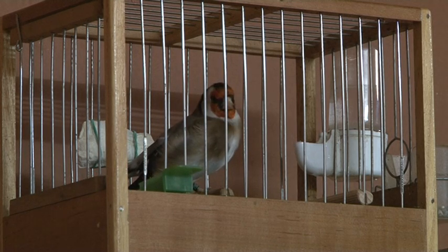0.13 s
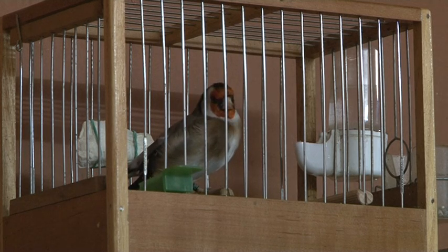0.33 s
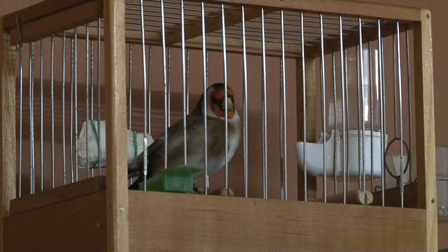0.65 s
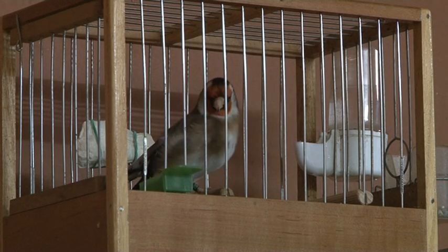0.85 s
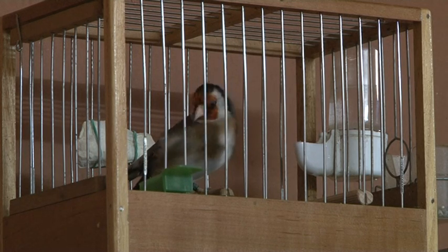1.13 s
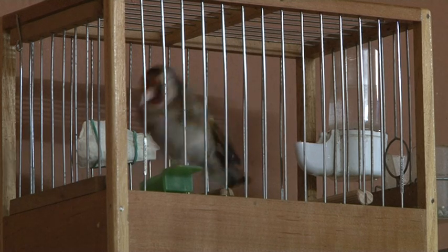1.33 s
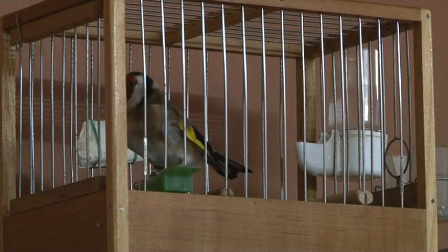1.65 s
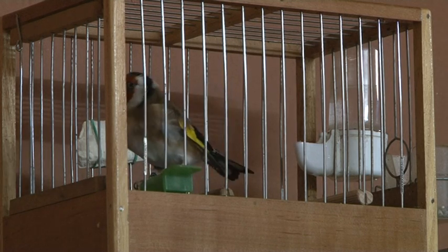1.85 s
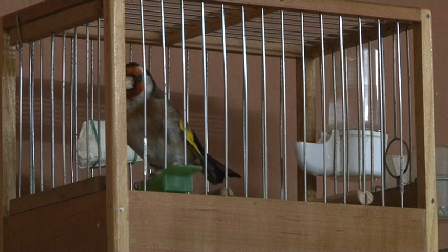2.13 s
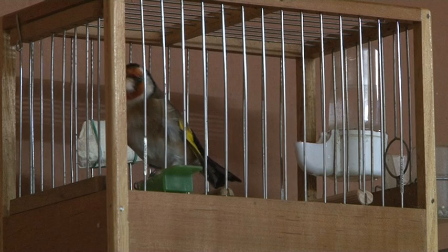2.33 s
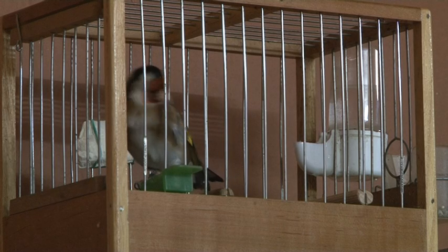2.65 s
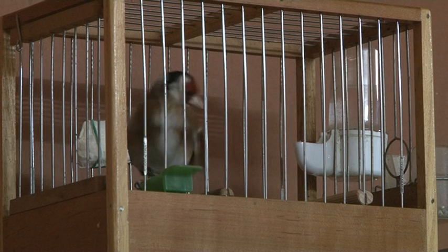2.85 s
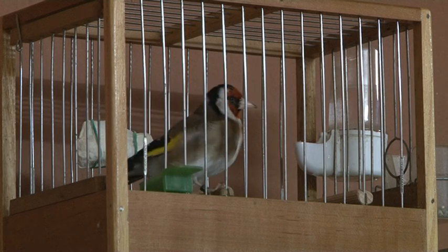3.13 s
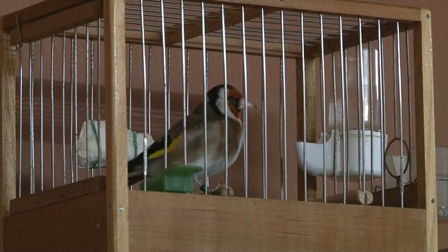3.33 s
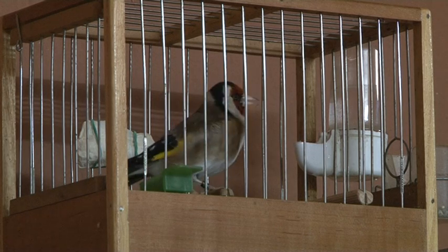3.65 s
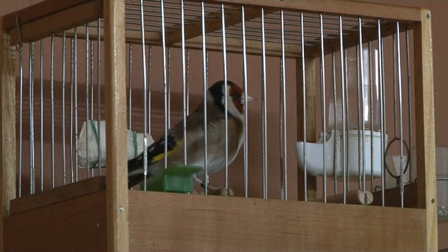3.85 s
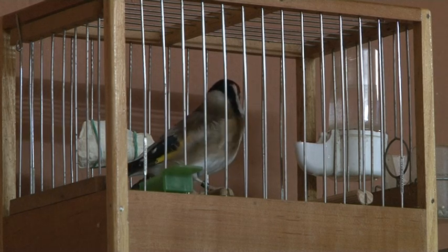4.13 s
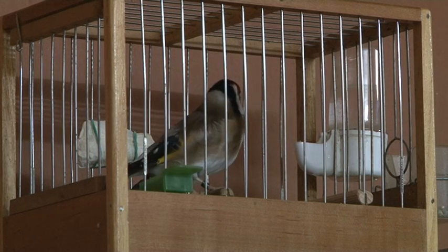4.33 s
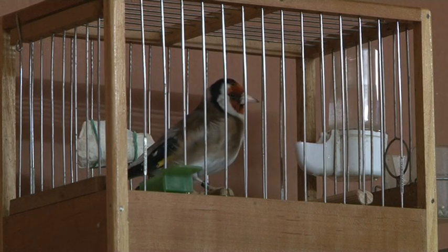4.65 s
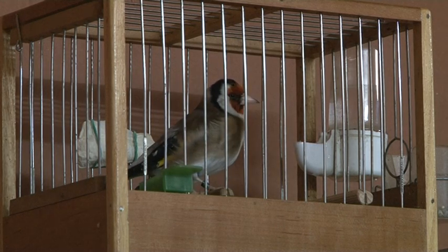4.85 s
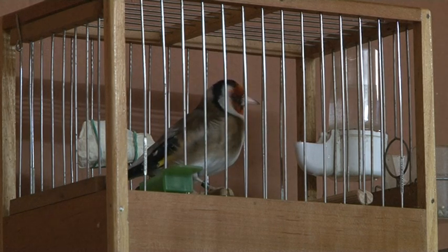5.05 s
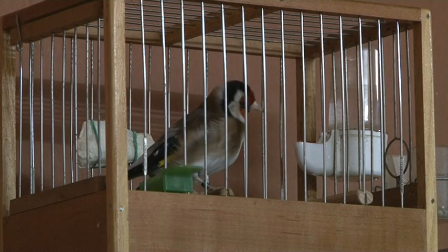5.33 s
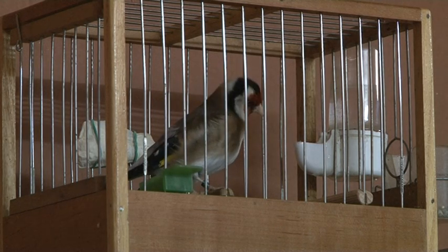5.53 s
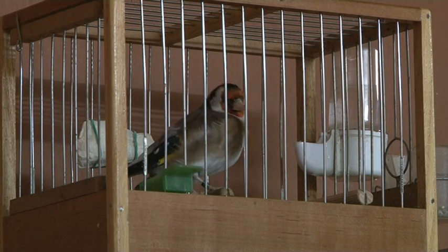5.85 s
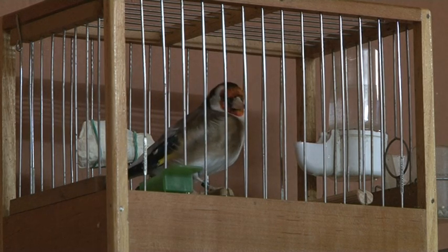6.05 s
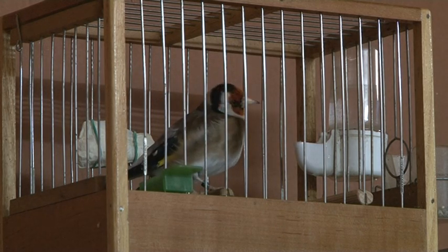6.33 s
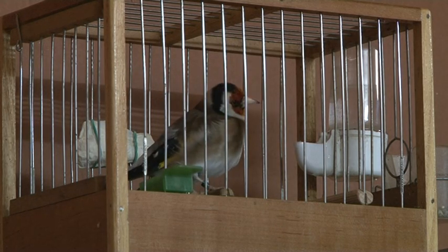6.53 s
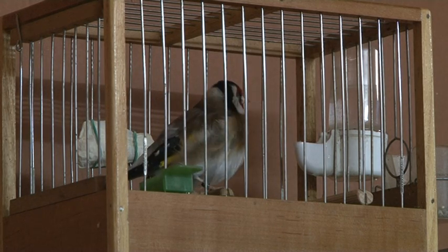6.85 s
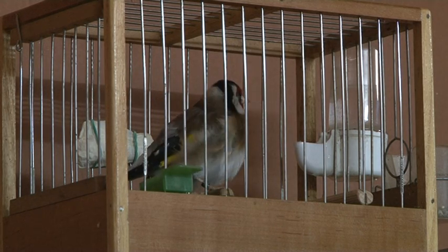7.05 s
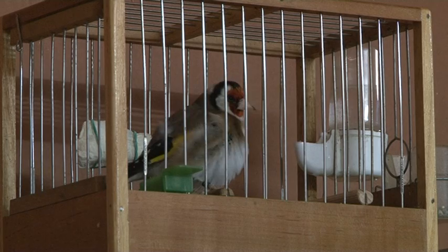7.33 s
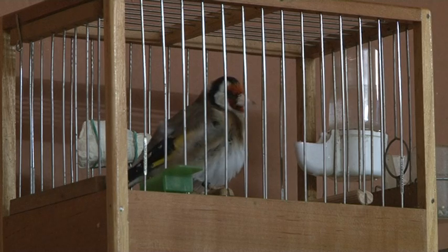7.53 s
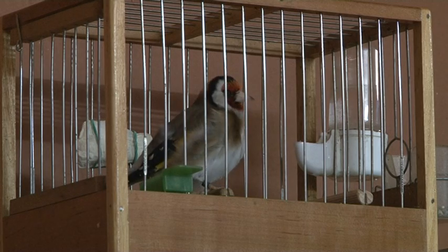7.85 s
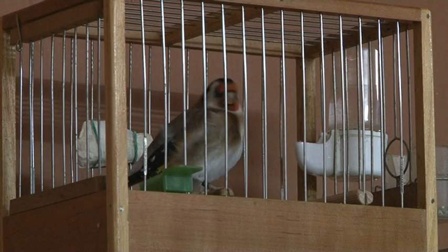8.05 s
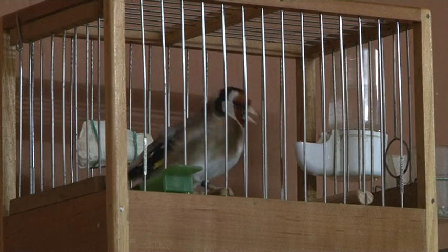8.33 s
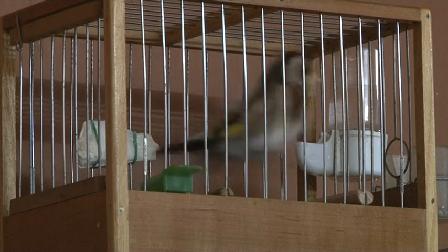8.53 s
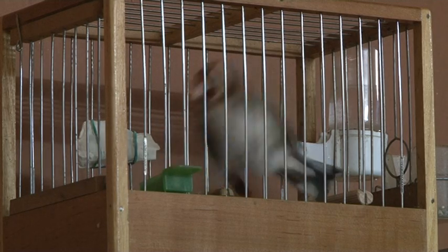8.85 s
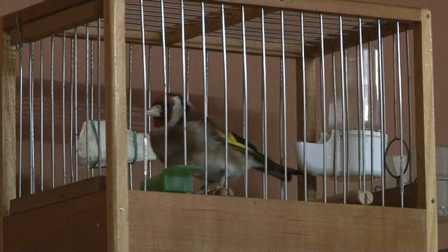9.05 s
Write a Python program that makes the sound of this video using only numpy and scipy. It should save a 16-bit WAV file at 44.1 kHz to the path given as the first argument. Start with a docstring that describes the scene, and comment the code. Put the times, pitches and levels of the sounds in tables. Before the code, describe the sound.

Five quick bursts of thin whistles, nasal buzzes and chirps from a small finch indoors, with claw scuffs and dull wooden knocks between.

```python
"""Five short twittering phrases of a small caged finch, close to a camera in a bare, echoing room.
Gliding whistles are near sines, duets two voices at once, buzzes and a rattle pulsed or many-partial tones;
between them claws and feathers scuff as filtered noise. Dull wooden knocks and a ticking clock are struck
modes. Behind lie shaped noise for the room's air and hiss, wavering hum and the whine of a tube screen."""
import sys
import numpy as np
from scipy import signal
from scipy.fft import rfft, irfft, next_fast_len
from scipy.io import wavfile
from scipy.ndimage import uniform_filter1d

SR = 44100
rng = np.random.default_rng(int(sys.argv[2]) if len(sys.argv) > 2 else 0)


def wrap_up_sound(samples):
    """Save the sound to the file named by the first command line argument, as 16-bit audio."""
    columns = np.atleast_2d(samples).T
    # keep every value between -1 and 1, then stretch to whole-number steps
    tamed = np.clip(columns, -1, 1)
    steps = np.round(tamed * 32767).astype(np.int16)
    wavfile.write(sys.argv[1], SR, steps)


def makeup_ratio(level_db):
    """Linear amplitude ratio for a level in decibels (20 dB per factor of ten)."""
    decades = np.asarray(level_db, float) / 20
    return 10 ** decades


N = 405719
LEAD = SR // 2  # samples kept ahead of time zero, so earlier notes can leave their echoes
SIDES = np.array([[.5], [-.5]])  # left and right share of a level or phase difference


def read(points, hz):
    """Table value on a log-frequency axis."""
    f, value = np.transpose(points)
    return np.interp(np.log(hz + 1), np.log(f + 1), value)


def evened(x):
    """Scales to rms 1."""
    return x / np.sqrt(np.mean(x ** 2) + 1e-20)


def add(mix, start_s, sound):
    """Mixes a sound in at its start time."""
    part = mix[..., LEAD + round(start_s * SR):][..., :sound.shape[-1]]
    part += sound[..., :part.shape[-1]]


def wobble(size, span):
    """Slow random drift of rms 1, smoothed twice over span samples."""
    smooth = uniform_filter1d(rng.standard_normal(size), int(span))
    return evened(uniform_filter1d(smooth, int(span)))


# The finch's pitch shapes by name: start and end [share of middle pitch],
# haste [under 1 glides early], loudest_at [share of length]
PITCH_SHAPES = {"sweep": (0.62, 1.19, 1.03, 0.54), "rise": (.86, 1.15, 1.1, 0.4515),
                "lift": (.93, 1.168, 0.866, 0.41), "hook": (.72, 1.1, 0.8, 0.54),
                "climb": (.88, 1.139, 0.98, 0.46), "part": (1.05, .94, 1.1, 0.44),
                "level": (0.9, 0.8, 1, .5), "scoop": (1.19, 0.942, 0.74, 0.45),
                "snap": (0.54, 1.04, .65, 0.38), "sink": (1.035, .915, 1.05, .5),
                "reach": (.83, 1.132, .95, 0.43), "flat": (1.008, .985, .95, 0.54),
                "settle": (0.8, 1.01, 0.6, 0.46), "tilt": (.94, 1.04, .95, 0.62),
                "sag": (1.02, 0.953, 0.977, 0.54), "dip": (1.12, 1.005, 1.2, 0.58),
                "fall": (1.1, .91, .95, 0.44), "drop": (1.16, 0.78, 1.4, 0.42)}
PITCH_SHAPES["arch"] = PITCH_SHAPES.pop("level")  # climbs to the middle pitch, then drops below its start
ACCENT_DB, ACCENT_WIDTH = 8, .12  # a short push of air inside a note; width as share of its length


def glide(shape, length_s, middle_hz, level_db, peak_at=None, push_at=None):
    """Pitch on a parabola through start, middle and end, its phase, and a swell of breath."""
    u = np.linspace(0, 1, round(length_s * SR))
    start, end, haste, usual_peak = PITCH_SHAPES[shape]
    parabola = np.polyfit([0, .5, 1], [start, 1, end], deg=2)
    hz = middle_hz * np.polyval(parabola, u ** haste)
    hz = hz * (1 + .005 * wobble(len(u), 30))
    warp = np.log(.5) / np.log(peak_at or usual_peak)  # puts the loudest moment at its share of the length
    swell = np.sin(np.pi * u ** warp) ** 1.24
    if push_at:
        swell = swell * makeup_ratio(ACCENT_DB * np.exp(-((u - push_at) / ACCENT_WIDTH) ** 2))
    phase = 2 * np.pi * (np.cumsum(hz) / SR + rng.random())
    return hz, phase, makeup_ratio(level_db) * swell


# 2nd to 4th partial of a whistle at the source: level_db [dB against the first]
OVERTONES_DB = [-14, -16.5, -13]
# What the beak does to overtones on the way out: pitch_hz [Hz], gain_db [dB]
BEAK = [(1000, -46.5), (2000, -32.5), (3000, 4.5), (6000, -4), (8000, -17.5), (11000, -21), (15000, -28)]
BREATH_DB = -27  # turbulence riding on a whistle, before any hoarseness


def whistle(hz, phase, swell, rich_db=0, hoarse_db=0):
    """Near sine; the beak dulls the overtones that fall high, and turbulence blurs them most."""
    breath = makeup_ratio(BREATH_DB + hoarse_db) * wobble(len(hz), 22)
    tone = (1 + breath) * np.sin(phase)
    for k, db in enumerate(OVERTONES_DB, start=2):
        level = makeup_ratio(db + rich_db + read(BEAK, k * hz)) * (k * hz < SR / 2)
        tone = tone + level * np.sin(k * (phase + 3 * breath))
    return swell * tone


# Low pair answering each duet of the second phrase:
# delay_s [s], shape [name], length_s [s], middle_hz [Hz], level_db [dB]
ANSWER_PAIR = [(.001, "hook", 0.0315, 3071, -25.5), (0.041, "reach", 0.042, 3935, -23.5)]
# Each time the pair is sung: start_s [s], delay_stretch [factor], effort_db [dB], push_at [share of length]
ANSWER_TIMES = [(3.817, 0.94, 0, 0.57), (4.043, 1.07, -1, 0.37), (4.278, .97, -0.5, 0.35),
                (4.534, 1.12, 0.3, 0.39)]


def answers():
    """Whistle rows of the answering pairs; the air is pushed inside the second note of each."""
    rows = []
    for start_s, stretch, effort_db, push_at in ANSWER_TIMES:
        for delay_s, shape, length_s, hz, db in ANSWER_PAIR:
            push = push_at if shape == "reach" else None
            rows.append((start_s + stretch * delay_s, shape, length_s, hz, db + effort_db, None, push))
    return rows


# One trill note: length_s [s], middle_hz [Hz], level_db [dB]
TRILL_NOTE = (0.0253, 4750, -18)
# Faint downward flick that ends the longer notes: delay_s [s], length_s [s], middle_hz [Hz], level_db [dB]
TRILL_FLICK = (.016, .011, 3950, -33)
TRILL_START_S, TRILL_GAP_S, TRILL_COUNT = 8.455, .0743, 4
TRILL_SPREAD = .015  # random pitch spread of the later notes, as a share


def trill():
    """Whistle rows of a trill of falling notes, the first louder, shorter and a little higher."""
    length_s, hz, db = TRILL_NOTE
    rows = [(TRILL_START_S, "scoop", 0.0168, hz * 1.04, db + 4.5)]
    for k in range(1, TRILL_COUNT):
        start_s = TRILL_START_S + k * TRILL_GAP_S
        note_hz = hz * (1 + TRILL_SPREAD * rng.standard_normal())
        rows.append((start_s, "scoop", length_s, note_hz, db))
        rows.append((start_s + TRILL_FLICK[0], "drop", *TRILL_FLICK[1:]))
    return rows


# Single whistles: start_s [s], shape [name], length_s [s], middle_hz [Hz], level_db [dB];
# the first ones end just before time zero
WHISTLES = [(-.2, "sweep", 0.042, 3040, -21.5), (-.13, "sag", 0.025, 6510, -40.5),
            (-.16, "rise", 0.0585, 3964, -32.5), (-.07, "climb", 0.029, 4640, -36.5),
            (-.11, "drop", 0.011, 5240, -29), (1.791, "rise", 0.024, 2810, -39.5),
            (1.797, "sweep", 0.023, 4290, -27.5), (1.905, "rise", 0.026, 2776, -34.5),
            (1.999, "hook", 0.016, 4080, -23), (2.087, "tilt", 0.017, 3114, -26),
            (2.204, "tilt", 0.021, 2624, -25.5), (2.242, "flat", 0.02, 5914, -13.5),
            (2.277, "part", 0.022, 5100, -19), (2.283, "dip", 0.014, 4330, -17.5),
            (3.615, "settle", 0.038, 2824, -25), (3.715, "snap", 0.027, 4730, -20.5),
            (5.983, "lift", 0.018, 2707, -31), (6.072, "sweep", 0.023, 4134, -23.5),
            (6.153, "lift", 0.014, 2510, -43), (6.173, "rise", 0.0084, 2375, -33.5),
            (6.182, "sag", 0.027, 2690, -40.5), (6.345, "flat", 0.021, 5727, -25),
            (6.37, "tilt", 0.023, 5063, -19.5), (6.418, "hook", 0.016, 2670, -30.5),
            (6.431, "tilt", 0.025, 3924, -24), (6.452, "lift", 0.015, 4065, -33),
            (6.462, "lift", 0.039, 3150, -26.5), (6.476, "tilt", 0.09, 6610, -43),
            (6.52, "flat", 0.028, 6540, -21.5), (7.51, "rise", 0.023, 2436, -35.5),
            (7.572, "tilt", 0.014, 5060, -26), (7.596, "climb", 0.025, 3266, -24.5),
            (7.609, "fall", 0.039, 2550, -35.5), (7.659, "lift", 0.011, 6210, -26.5),
            (7.681, "lift", 0.02, 7420, -27.5), (7.684, "tilt", 0.015, 4120, -30),
            (7.699, "flat", 0.024, 4440, -34), (7.708, "lift", 0.025, 3730, -21),
            (7.894, "tilt", 0.027, 4830, -22.5), (7.91, "fall", 0.032, 2530, -32.5),
            (8.089, "settle", 0.045, 4200, -56.5), (8.093, "flat", 0.035, 3825, -57.5),
            (8.245, "flat", 0.02, 3550, -58), (8.675, "sag", 0.022, 5940, -37.5)]
# Shapes with stronger or weaker overtones: shape [name], level_db [dB]
RICH_DB = {"settle": 5.5, "hook": -1, "sweep": 1.5, "snap": 7.5}
# Shapes sung with more turbulence: shape [name], level_db [dB]
HOARSE_DB = {"hook": 10, "reach": 3, "sag": 6}


def sing_whistles(mix):
    """One voice of the bird, each note a glide in pitch with its own overtones and breath."""
    for start_s, *note in WHISTLES + answers() + trill():
        shape = note[0]
        add(mix, start_s, whistle(*glide(*note), RICH_DB.get(shape, 0), HOARSE_DB.get(shape, 0)))


UPPER_DB, DUET_PEAK_AT = -3.5, 0.45  # upper voice against the lower; loudest at this share of the length
DIFFERENCE_DB, SUM_DB = 10, -9  # strength of the difference tones, and of the sum tone before the beak


def duet(length_s, low_shape, low_hz, high_shape, high_hz, level_db):
    """Two membranes on one air stream also sound their sum and difference tones."""
    hz_a, a, swell_a = glide(low_shape, length_s, low_hz, level_db, DUET_PEAK_AT)
    hz_b, b, swell_b = glide(high_shape, length_s, high_hz, level_db + UPPER_DB, DUET_PEAK_AT)
    both = np.sqrt(swell_a * swell_b)
    difference = np.sin(2 * a - b) + .5 * np.sin(2 * b - a)
    difference = makeup_ratio(DIFFERENCE_DB) * both ** 3 * difference  # grows with the cube of the strength
    total = makeup_ratio(SUM_DB + read(BEAK, hz_a + hz_b)) * both * np.sin(a + b)
    return whistle(hz_a, a, swell_a) + whistle(hz_b, b, swell_b) + difference + total


# Both halves of the voice box at once: start_s [s], length_s [s], lower_shape [name], lower_hz [Hz],
# upper_shape [name], upper_hz [Hz], level_db [dB]
DUETS = [(3.747, 0.04, "flat", 5894, "tilt", 6240, -17.5), (3.974, 0.035, "sag", 5605, "sag", 6150, -18.5),
         (4.208, 0.026, "sink", 5650, "flat", 5974, -18.5), (4.463, 0.032, "sag", 5634, "sag", 6100, -18),
         (8.373, 0.032, "sink", 5490, "level", 6836, -13.5),
         (8.74, 0.083, "fall", 5034, "sag", 5207, -15.5)]
DUETS = [tuple("arch" if value == "level" else value for value in row) for row in DUETS]


def sing_duets(mix):
    """Two-voiced notes, both halves of the voice box sounding together."""
    for start_s, *voices in DUETS:
        add(mix, start_s, duet(*voices))


THROAT_WIDTH_HZ, THROAT_SKIRT_DB = 690, -12
WINDPIPE_HZ, WINDPIPE_WIDTH_HZ = 1830, 810  # low resonance heard in buzzes
RASP_DB = -9  # turbulence riding on a buzz


def buzz(rows, windpipe_db, half_db):
    """A low, unsteady pitch with many partials, the ones near the throat resonance strongest."""
    time_s, *columns = np.transpose(rows)
    t = np.arange(time_s[0], time_s[-1], 1 / SR)
    db, hz, throat_hz = (np.interp(t, time_s, c) for c in columns)
    unsteady = 1 + .015 * wobble(len(t), 25)
    phase = 2 * np.pi * np.cumsum(hz * unsteady) / SR
    k = np.arange(2, 40)[:, None] / 2  # whole partials and the lines halfway between
    gain = np.exp(-.5 * ((k * hz - throat_hz) / THROAT_WIDTH_HZ) ** 2) + makeup_ratio(THROAT_SKIRT_DB)
    gain = gain * makeup_ratio(0.87 * read(BEAK, k * hz)) * (k * hz < 16000)
    windpipe = np.exp(-.5 * ((k * hz - WINDPIPE_HZ) / WINDPIPE_WIDTH_HZ) ** 2)
    gain = gain + makeup_ratio(windpipe_db) * windpipe * (k > 1)
    gain = gain * np.where(k % 1, makeup_ratio(half_db), 1)
    spread = 0.52 * k ** 2  # spread phases: a reedy wave, not a click train
    tone = (gain * np.sin(k * phase + spread)).sum(0)
    rasp = 1 + makeup_ratio(RASP_DB) * wobble(len(t), 14)
    return makeup_ratio(db) * tone * rasp * signal.windows.tukey(len(t), .25)


# One list a buzz, its rows: time_s [s], level_db [dB], pitch_hz [Hz], throat_hz [Hz]
BUZZES = [
    [(2.02, -43.5, 760, 6200), (2.045, -33, 1130, 4850), (2.066, -24, 1275, 4950),
     (2.088, -33.5, 1359, 5160)],
    [(2.165, -30, 1217, 5870), (2.18, -33.5, 1147, 4570), (2.205, -40, 967, 2510)],
    [(6.232, -53, 635, 7450), (6.26, -39.5, 891, 7300), (6.283, -38, 978, 6430), (6.302, -33, 1037, 4450),
     (6.32, -42, 1133, 3000)],
    [(7.56, -45, 711, 3260), (7.578, -30, 1028, 4840), (7.6, -26.5, 1155, 5900)],
    [(7.657, -29.5, 823, 7200), (7.68, -30, 1001, 6860), (7.7, -34, 1134, 3960)],
    [(7.85, -41, 871, 2940), (7.868, -38.5, 1031, 3940), (7.897, -40.5, 764, 3330)],
]
# Windpipe resonance in each buzz: level_db [dB]
WINDPIPE_DB = [-13, -15, -10.5, -18.5, -54, -25]
# Alternation of strong and weak pulses, heard as lines halfway between partials, in each buzz: level_db [dB]
HALF_DB = [-11, -9.5, -6.5, -22.5, -22, -22]


def sing_buzzes(mix):
    """Nasal buzzes, each with its own windpipe strength and pulse alternation."""
    for rows, windpipe_db, half_db in zip(BUZZES, WINDPIPE_DB, HALF_DB):
        add(mix, rows[0][0], buzz(rows, windpipe_db, half_db))


# A falling note chopped into pulses: time_s [s], pitch_hz [Hz], level_db [dB]
RATTLE = [(2.167, 5870, -34.5), (2.172, 5920, -25), (2.179, 4950, -19.5), (2.187, 3570, -22),
          (2.2, 3450, -27.5), (2.208, 3100, -31)]
RATTLE_PER_S = 150  # pulses a second


def rattle():
    """The air stream opens and shuts quickly while the pitch falls."""
    time_s, pitch_hz, level_db = np.transpose(RATTLE)
    t = np.arange(time_s[0], time_s[-1], 1 / SR)
    gate = np.sin(np.pi * RATTLE_PER_S * (t - time_s[1]) + np.pi / 2) ** 2
    hz = np.interp(t, time_s, pitch_hz)
    phase = 2 * np.pi * np.cumsum(hz) / SR
    swell = makeup_ratio(np.interp(t, time_s, level_db)) * gate * signal.windows.tukey(len(t), .2)
    return whistle(hz, phase, swell)


def scuff(length_s, level_db, hz, width_hz):
    """A cluster of tiny scratches, coloured by what is scraped."""
    size = round(length_s * SR)
    grains = rng.standard_normal(size) * makeup_ratio(0.8 * wobble(size, 23)) * signal.windows.tukey(size, .4)
    f = np.fft.rfftfreq(size, 1 / SR)
    colour = 1 / (1 + ((f - hz) / (width_hz / 2)) ** 2)
    return makeup_ratio(level_db) * evened(irfft(rfft(grains) * colour, size))


# Claws and feathers on the perch: start_s [s], length_s [s], level_db [dB], centre_hz [Hz], width_hz [Hz]
SCUFFS = [(0.91, 0.053, -69, 3060, 2940), (1.254, 0.026, -59.5, 1650, 402), (1.257, 0.0089, -59, 3490, 700),
          (1.418, 0.012, -58.5, 3170, 5740), (2.993, 0.047, -65.5, 6000, 4560),
          (3.072, 0.018, -62.5, 4030, 5050), (3.086, 0.014, -61.5, 2900, 400),
          (4.904, 0.039, -64.5, 3785, 3920), (4.984, 0.0068, -59.5, 3470, 4987),
          (5.251, 0.017, -66.5, 1720, 1980), (5.728, 0.033, -64.5, 3356, 4050),
          (5.865, 0.016, -60.5, 2800, 2980), (5.898, 0.067, -59.5, 2680, 4750),
          (7.252, 0.016, -63.5, 1770, 1488), (7.388, 0.019, -67, 3930, 4900),
          (8.273, 0.0094, -68.5, 9500, 6000), (9.024, 0.011, -64.5, 8640, 4840)]


def scuffs(mix):
    """The bird shifting about, each movement a burst of scratchy noise."""
    for start_s, *scrape in SCUFFS:
        add(mix, start_s, scuff(*scrape))


SPOT_DB_PER_OCTAVE, SPOT_MOST_DB = 88.5, 11.5  # modes away from the struck spot's pitch are weaker


def knock(level_db, pan_db, spot_hz, modes):
    """A soft blow with a 1.6 ms onset rings the struck thing's modes."""
    t = np.arange(6000) / SR
    ring = 0
    for hz, mode_db, t60 in modes:
        off_spot_db = min(SPOT_DB_PER_OCTAVE * abs(np.log2(hz / spot_hz)), SPOT_MOST_DB)
        db = mode_db + 1.6 * rng.standard_normal() - off_spot_db - 60 * t / t60
        ring = ring + makeup_ratio(db) * np.sin(2 * np.pi * (hz * t + rng.random()))
    return makeup_ratio(level_db + SIDES * pan_db) * ring * np.minimum(t / 0.0016, 1)


# Knocks: start_s [s], level_db [dB], left_over_right_db [dB], spot_hz [Hz near which the spot rings best]
KNOCKS = [(3.076, -53.5, -3, 865), (3.209, -59, -1, 935), (3.511, -50.5, -3, 945), (3.719, -57, -2, 873),
          (3.981, -59, 1, 957), (4.918, -58, 9, 902), (4.99, -42.5, -3, 985), (5.528, -55.5, -2.5, 973),
          (5.73, -59, -5, 936), (5.868, -51.5, 0, 977), (5.905, -42, -1, 1003), (6.746, -58, -4.5, 880),
          (8.136, -49, -2, 980), (8.657, -54.5, -2, 1000)]
# Modes of the wood: pitch_hz [Hz], level_db [dB], t60_s [s to fall 60 dB]
WOOD = [(863, -2.5, 0.1), (946, -2.5, 0.12), (1046, -1, 0.1), (1294, -3, 0.099), (2192, -9.5, 0.064)]


def knocks(mix):
    """Dull blows on wood, each with its own left-right balance."""
    for start_s, *blow in KNOCKS:
        add(mix, start_s, knock(*blow, WOOD))


# Modes of the clock: pitch_hz [Hz], level_db [dB], t60_s [s to fall 60 dB]
CLOCK = [(630, 3.87, 0.081), (840, 6, 0.034), (1867, 3, 0.039)]
CLOCK_START_S, CLOCK_DB = .43, -63


def clock(mix):
    """One struck tick a second, a little to the right."""
    for second in range(9):
        add(mix, CLOCK_START_S + second, knock(CLOCK_DB, -2.5, CLOCK[0][0], CLOCK))


# First single echoes off cage and walls: delay_ms [ms], level_db [dB]
ECHOES = [(1.2, -15), (2.0, -19), (2.9, -20), (4.6, -21), (7.5, -13), (13.2, -20), (25.6, -9.5),
          (45.5, -14.5)]
# The beak throws high notes forward; applied to all direct sound: pitch_hz [Hz], gain_db [dB]
BEAM = [(2500, -3), (4500, 0), (6800, 4.5), (12000, 4)]


def early(x):
    """The direct sound, coloured by the beam, and its first single echoes."""
    taps = np.zeros(SR // 10)
    for ms, db in ECHOES:
        taps[round(ms * SR / 1000)] = makeup_ratio(db)
    length = x.shape[1]
    size = next_fast_len(length)
    beam = makeup_ratio(read(BEAM, np.fft.rfftfreq(size, 1 / SR)))
    direct = irfft(rfft(x, size) * beam, size)[:, :length]
    return direct + signal.oaconvolve(x, taps[None], axes=1)[:, :length]


# Decay of the bare room: pitch_hz [Hz], t60_s [s to fall 60 dB]
ROOM = [(800, 0.57), (2500, 0.39), (4000, 0.39), (6000, 0.36), (7000, 0.31), (10400, 0.2)]
ROOM_SAME = 0.62  # likeness of the tail at the two microphones


def room(x):
    """Dense echoes, each band dying at its own speed, largely alike at two close microphones."""
    taps = np.zeros((2, SR // 2))
    at = np.arange(130, SR // 2 - 20, 20) + rng.integers(0, 20, (2, (SR // 2 - 131) // 20))
    np.put_along_axis(taps, at, rng.choice([-1., 1.], at.shape), 1)
    hz, t, z = signal.stft(taps, SR, nperseg=256)
    decay = makeup_ratio(-60 * t / read(ROOM, hz)[:, None])
    both, apart = signal.istft(z * decay, SR, nperseg=256)[1]
    tail = np.sqrt((1 + ROOM_SAME) / 2) * both + np.sqrt((1 - ROOM_SAME) / 2) * np.outer([1, -1], apart)
    return signal.fftconvolve(x, tail / np.linalg.norm(tail[0]), axes=1)[:, :x.shape[1]]


# Colour of the room's air and the hiss: pitch_hz [Hz], level_db [relative dB per Hz]
AIR = [(18, -34), (40, -14.5), (101, -22.5), (128, -21.5), (156, -12.5), (278, -6.5), (308, -11), (389, -3),
       (574, -7.5), (825, -8), (1070, -11), (3090, -15.5), (3340, -19), (4110, -18), (14600, -30.5)]
# Left-right likeness of that noise: pitch_hz [Hz], likeness [0 to 1]
AIR_SAME = [(60, 0.26), (240, 0.99), (950, 0.092), (3770, 0.43), (15000, 0.12)]
AIR_DB = -64  # rms before the slow drift of the background


def air():
    """Low murmur of the building and microphone hiss, in drifting patches."""
    frames, hz = N // 512 + 5, np.fft.rfftfreq(2048, 1 / SR)
    a, b, c, d, patches = rng.standard_normal((frames, 1025, 5)).T
    patches = uniform_filter1d(patches, 10, axis=0)
    patches = evened(uniform_filter1d(patches, 8, axis=1))
    same = read(AIR_SAME, hz)[:, None]
    left = a + 1j * b
    right = same * left + np.sqrt(1 - same ** 2) * (c + 1j * d)
    top = 1 + (hz[:, None] / 14800) ** 30  # hiss ends at the top
    z = np.array([left, right]) * makeup_ratio(read(AIR, hz)[:, None] + 1.5 * patches) / top
    return makeup_ratio(AIR_DB) * evened(signal.istft(z, nperseg=2048, noverlap=1536)[1][:, :N])


# Tones of mains and household machines: pitch_hz [Hz], level_db [dB rms before wavering and drift]
HUM = [(101, -84.5), (198, -80), (344.6, -75.5), (398, -76), (1880, -80.5), (3286, -78)]
HUM_LAG, HUM_PAN_DB = 0.8, -2.5  # left against right: radians, dB


def hum():
    """Thin tones of household machines, wavering in level and phase."""
    t = np.arange(N) / SR
    total = 0
    for hz, db in HUM:
        level = np.sqrt(2) * makeup_ratio(db + SIDES * HUM_PAN_DB + 1.5 * wobble(N, 3000))
        total = total + level * np.sin(2 * np.pi * hz * t + SIDES * HUM_LAG + 1.2 * wobble(N, 2900))
    return total


# Line whistle of the screen and two weaker lines 50 and 100 Hz below: pitch_hz [Hz], level_db [relative dB]
WHINE = [(15524.6, -84), (15574.6, -74), (15624.6, -62)]
WHINE_DB, WHINE_LAG, WHINE_PAN_DB = -60.5, 1.35, -4.5  # dB before drift; left behind right in radians; left over right in dB


def whine():
    """The line whistle of a tube screen with its 50 Hz-spaced sidebands, arriving from the right."""
    t = np.arange(N) / SR
    tone = sum(makeup_ratio(db) * np.sin(2 * np.pi * (hz * t + rng.random()) - SIDES * WHINE_LAG) for hz, db in WHINE)
    return makeup_ratio(WHINE_DB + SIDES * WHINE_PAN_DB) * evened(tone)


# Level drift of all steady sounds: time_s [s], level_db [dB]
BACKGROUND = [(0, -3.5), (1.1, -1.5), (2.301, -0.5), (2.601, -3.5), (3.199, -1), (5.5, -1.3), (8.42, 1.34),
              (8.6, -1), (9.2, -3.5)]
BIRD_ROOM_DB = 1.5  # bird and scuffs into the room tail; knocks and clock go in unchanged


def scene():
    """Bird and cage near the middle, knocks and clock about them, all in one room."""
    bird, struck = np.zeros(N + LEAD), np.zeros((2, N + LEAD))
    sing_whistles(bird)
    add(bird, RATTLE[0][0], rattle())
    sing_duets(bird)
    sing_buzzes(bird)
    scuffs(bird)
    knocks(struck)
    clock(struck)
    no_bass = signal.butter(4, 1100, "high", fs=SR, output="sos")  # a small body radiates no bass
    bird = signal.sosfilt(no_bass, bird) * makeup_ratio(np.array([[-.2], [.2]]))
    heard = early(bird + struck) + room(makeup_ratio(BIRD_ROOM_DB) * bird + struck)
    drift = makeup_ratio(np.interp(np.arange(N) / SR, *np.transpose(BACKGROUND)))
    return heard[:, LEAD:] + drift * (air() + hum() + whine())


def roll_off(x):
    """The treble ends steeply here."""
    return signal.sosfilt(signal.butter(12, 16290, fs=SR, output="sos"), x)


def record(dry):
    """The camera's band limit, a steep low-pass at 15850 Hz."""
    edge = signal.firwin(511, 15850, window=("kaiser", 9), fs=SR)
    mix = signal.oaconvolve(dry, edge[None], "same", axes=1)
    return roll_off(mix)


dry = scene()
out = record(dry)
wrap_up_sound(out)
```